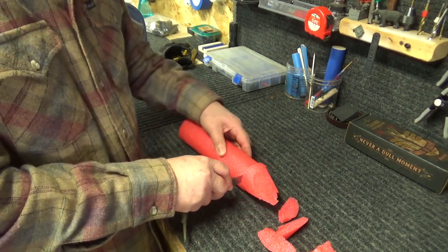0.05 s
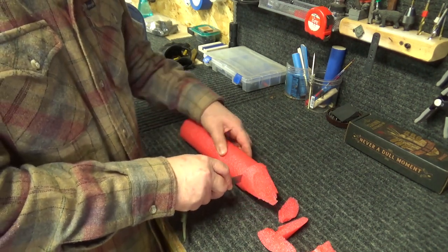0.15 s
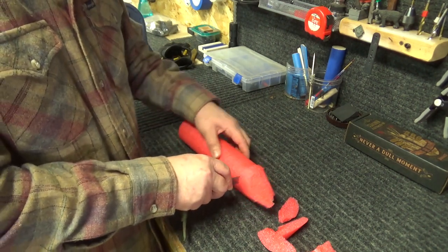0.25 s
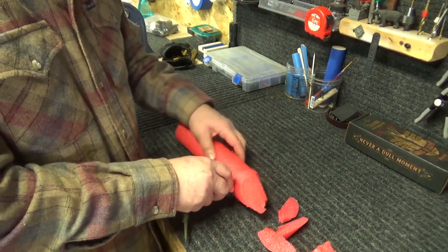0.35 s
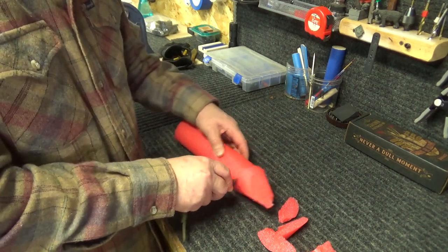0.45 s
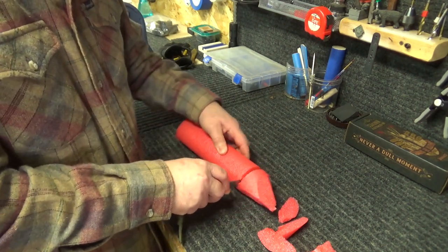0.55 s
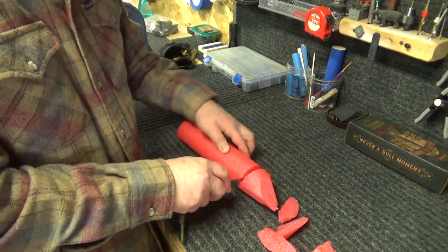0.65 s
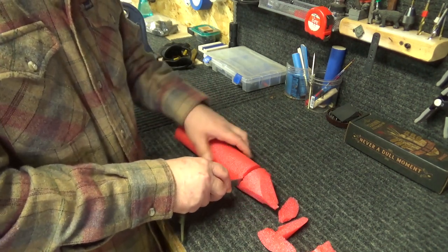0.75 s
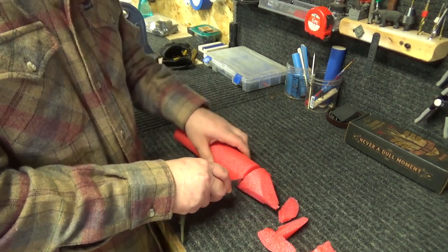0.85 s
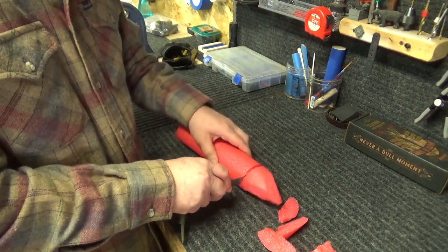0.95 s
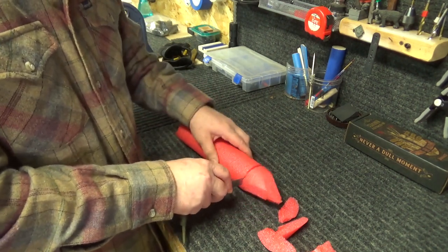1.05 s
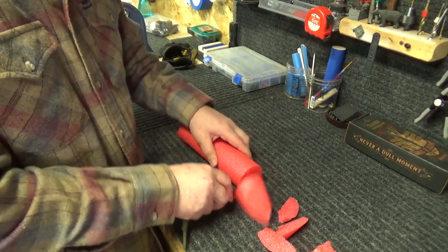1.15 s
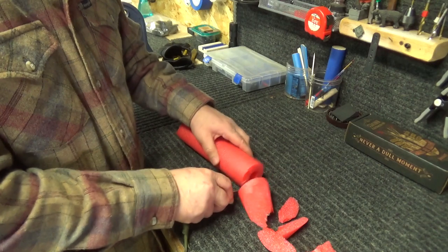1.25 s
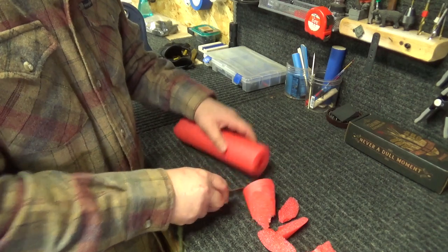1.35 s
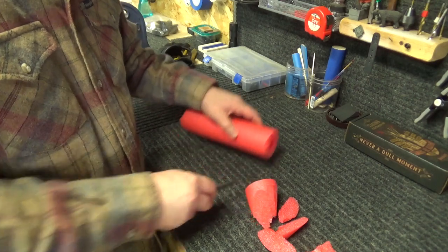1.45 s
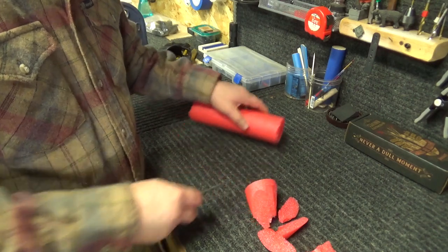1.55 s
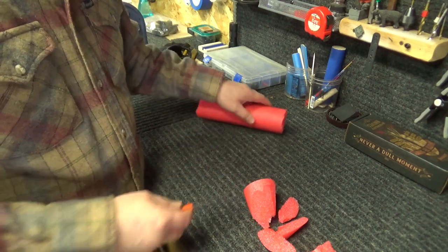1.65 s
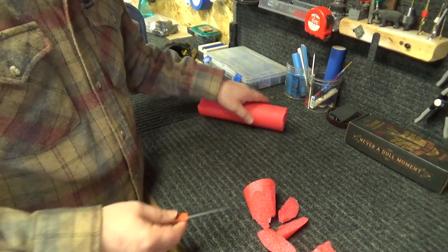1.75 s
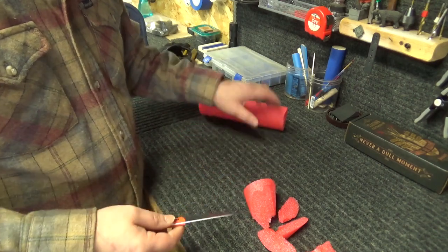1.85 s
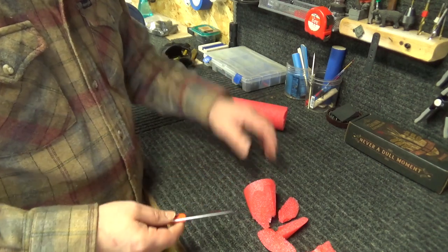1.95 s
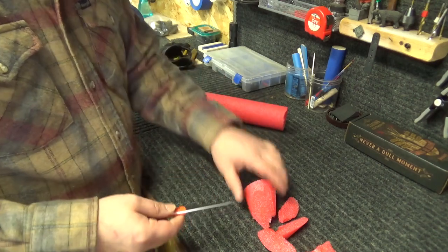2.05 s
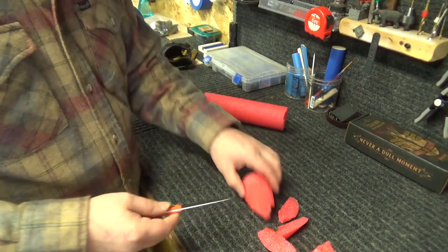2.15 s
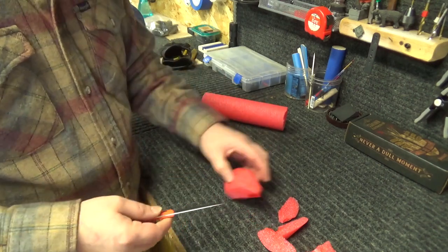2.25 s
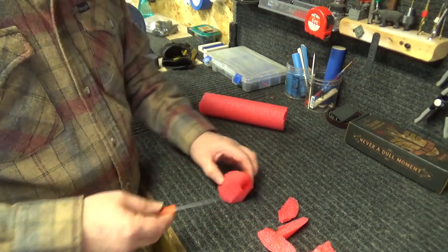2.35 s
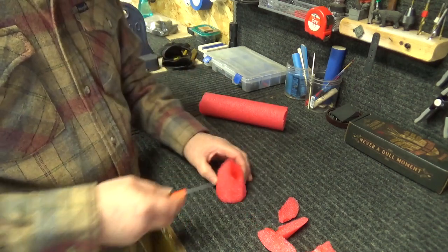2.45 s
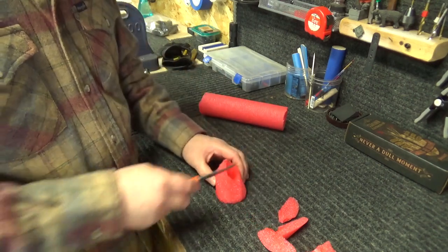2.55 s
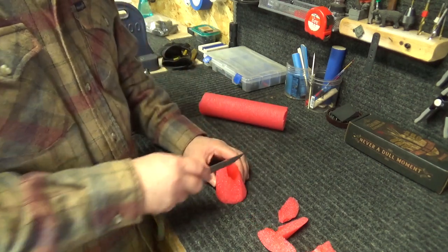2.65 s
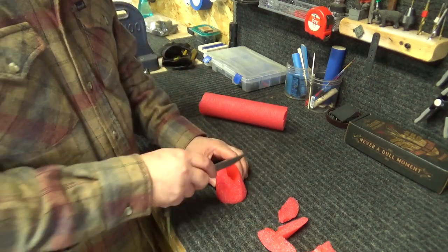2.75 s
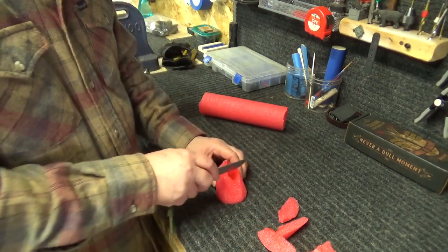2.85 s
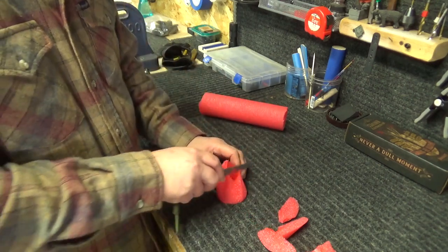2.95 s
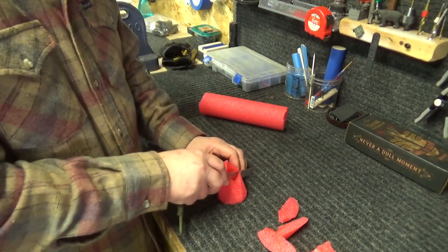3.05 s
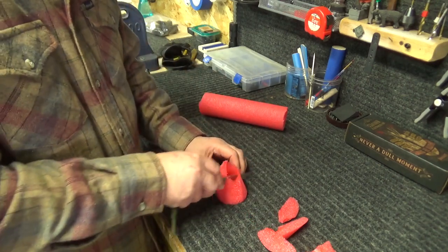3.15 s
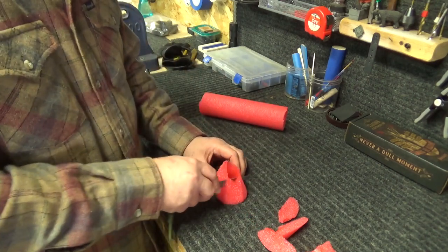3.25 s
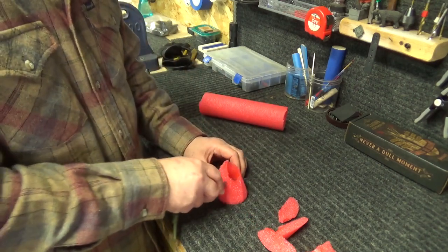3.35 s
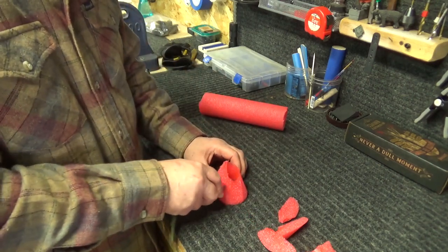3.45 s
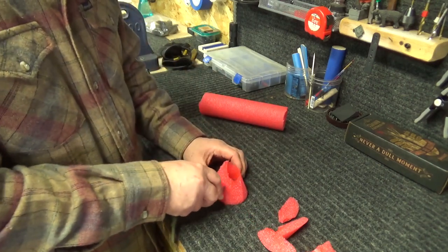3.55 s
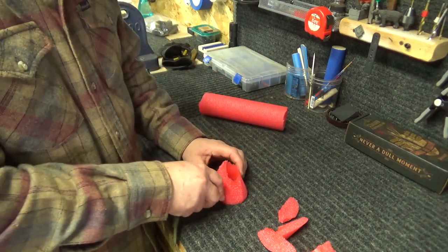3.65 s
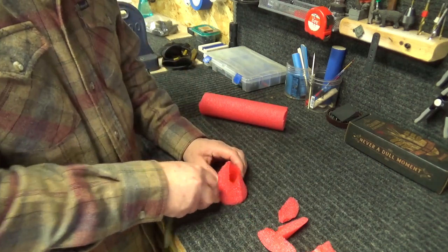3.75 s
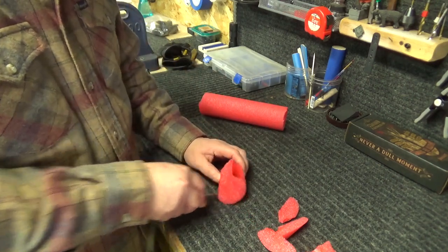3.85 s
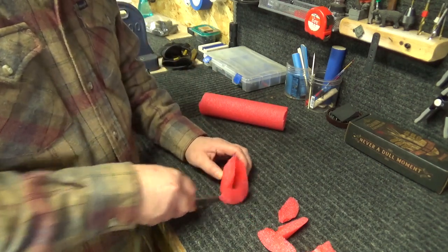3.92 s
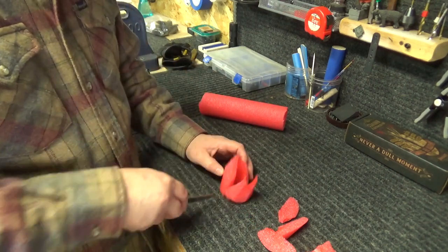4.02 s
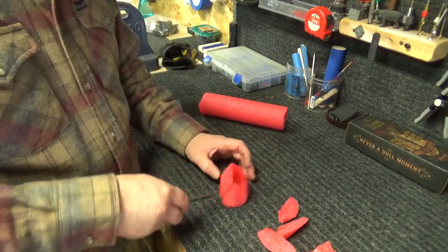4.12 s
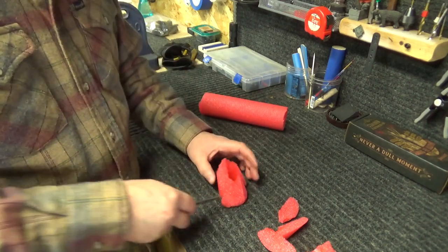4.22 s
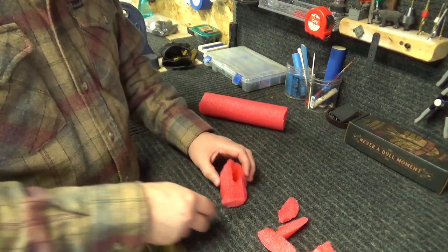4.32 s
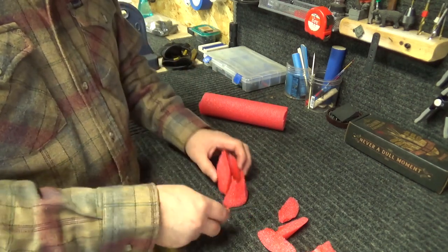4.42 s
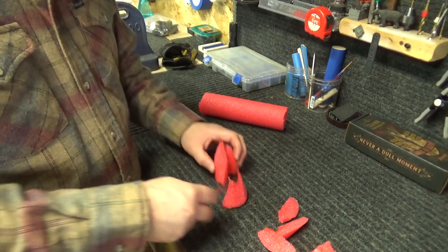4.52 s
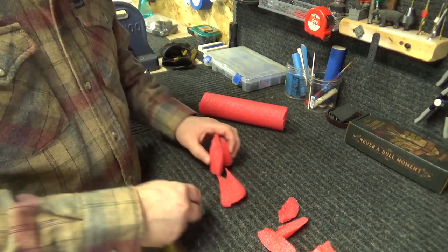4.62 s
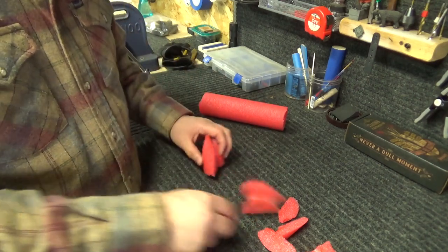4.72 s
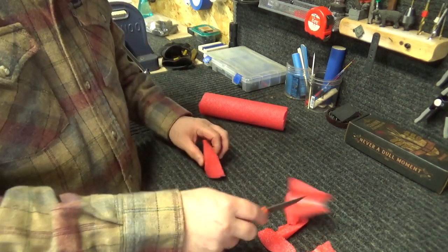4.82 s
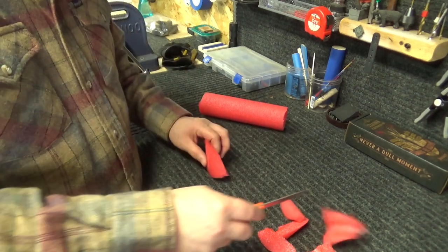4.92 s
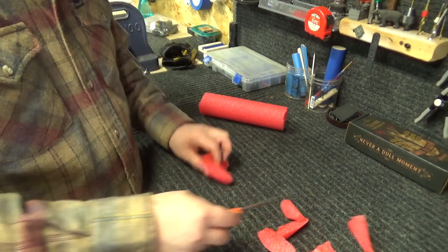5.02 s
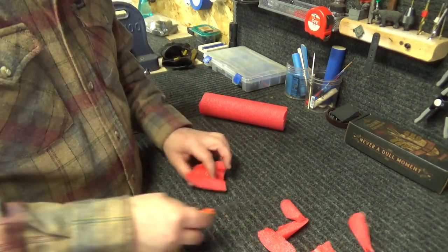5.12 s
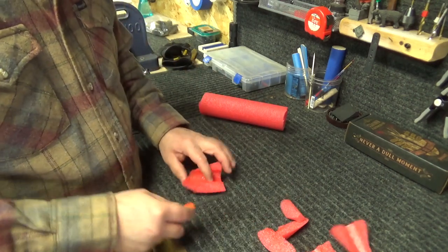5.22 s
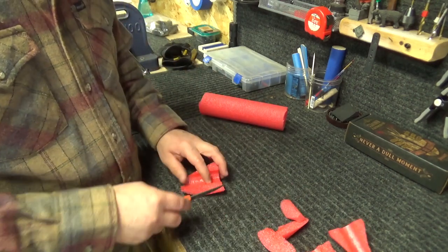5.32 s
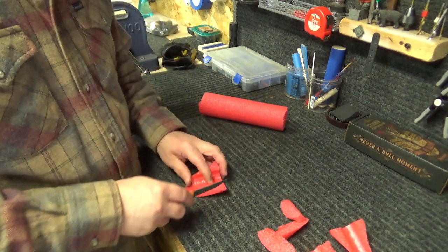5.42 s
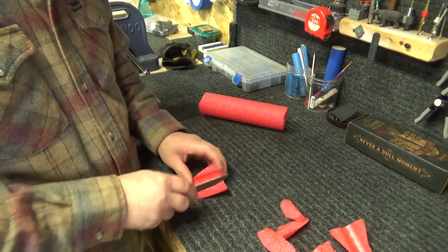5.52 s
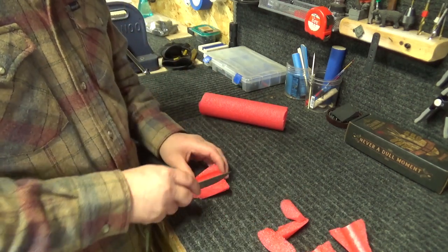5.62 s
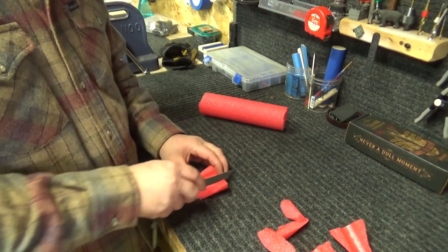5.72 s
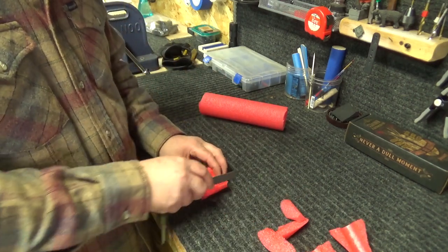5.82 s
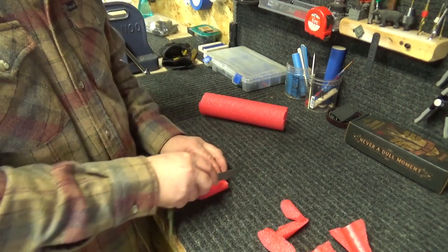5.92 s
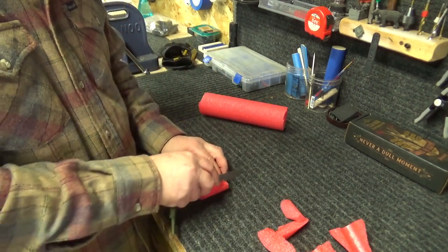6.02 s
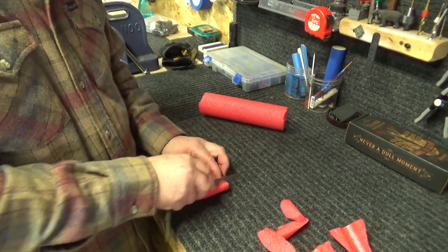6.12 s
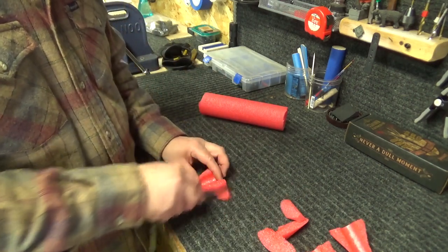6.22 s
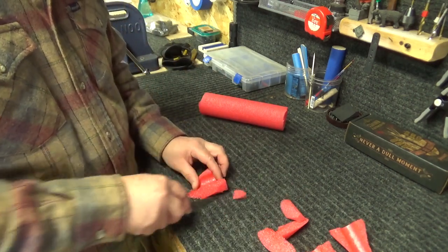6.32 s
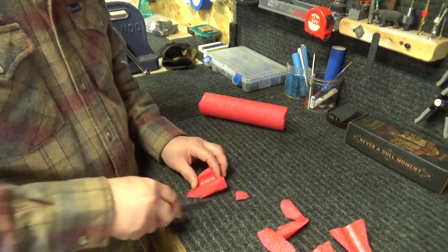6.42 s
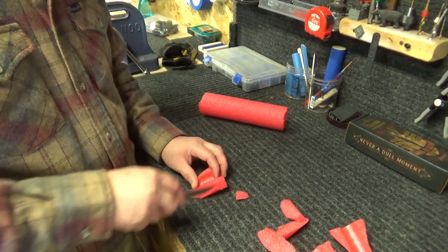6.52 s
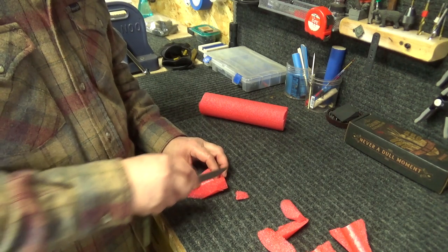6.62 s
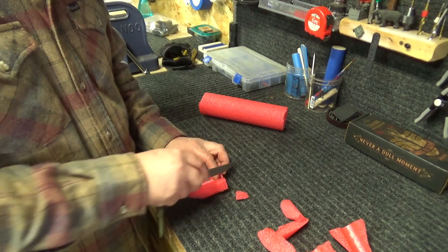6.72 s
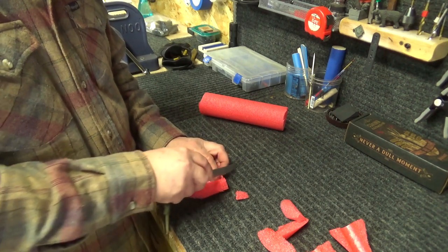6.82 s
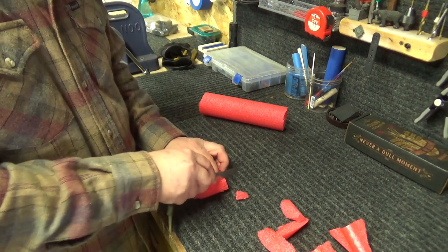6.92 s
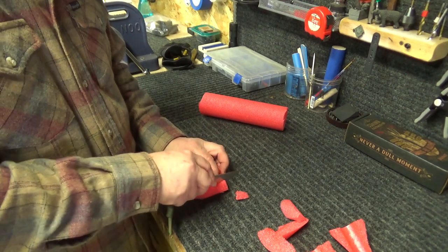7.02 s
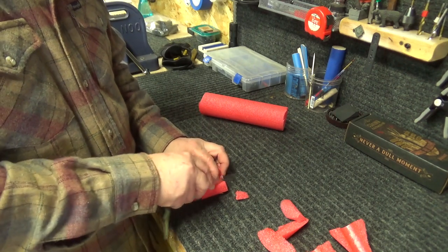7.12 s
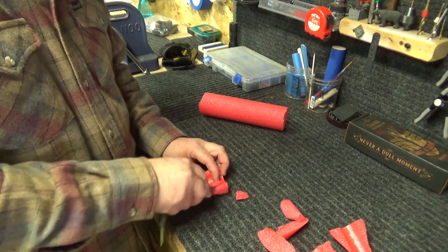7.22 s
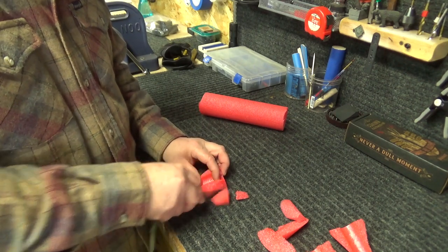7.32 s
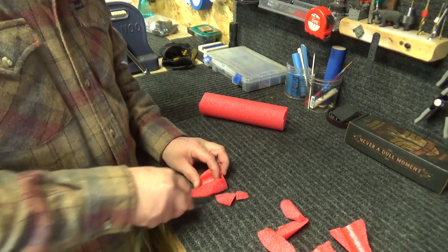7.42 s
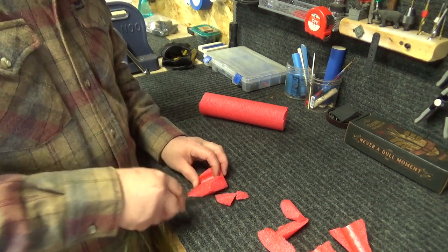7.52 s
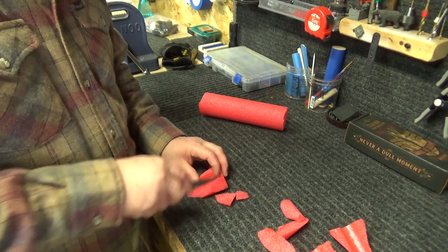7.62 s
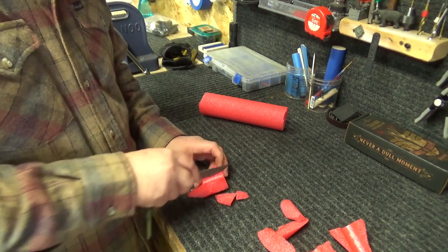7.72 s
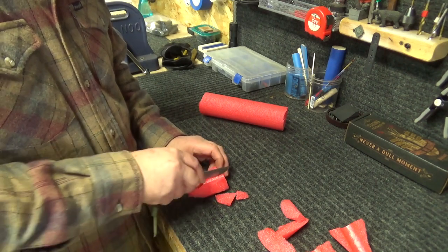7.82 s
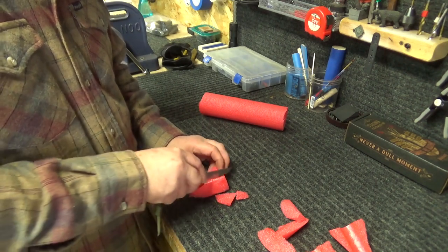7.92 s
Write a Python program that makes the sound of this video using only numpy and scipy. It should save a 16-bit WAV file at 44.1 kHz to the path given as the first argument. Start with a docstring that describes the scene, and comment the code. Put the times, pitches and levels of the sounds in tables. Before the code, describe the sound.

In a small, quiet workshop with a faint low hum, a thin knife cuts a foam noodle on a matted bench. First come a few dull hollow pops, then soft rubbing as the piece is picked up, then a dense run of loud crackling rips. After a lull of rustling, two short crisp snips finish. Close microphone, dry, short room tail.

```python
"""In a small, faintly humming workshop, a thin knife slices a hollow foam noodle on a matted bench, close by.
Bursting foam cells are random impulses convolved with damped modes of the cell wall and the hollow piece.
Strokes crackle in slips, snaps release at once, and both excite resonators for the thin blade.
Hands and sleeves rub the foam: grain noise through coloured filters and drifting resonances.
Bumps on the mat are damped bench modes; a short noise tail and one bench bounce form the room."""
import sys
import numpy as np
from scipy import signal
from scipy.fft import rfft, irfft
from scipy.io import wavfile

SR = 44100
rng = np.random.default_rng(int(sys.argv[2]) if len(sys.argv) > 2 else 0)


def transcribe(signal):
    """Save signal, clipped to [-1, 1], as a 16-bit WAV file at the path in sys.argv[1]."""
    frames = np.atleast_2d(signal).T
    limited = np.clip(frames, -1, 1)
    pcm = np.round(limited * 32767).astype(np.int16)
    wavfile.write(sys.argv[1], SR, pcm)


N = 351473
T = np.arange(N) / SR  # time axis, t/s

# Levels in the tables are those of the source, ahead of the resonators and the room.
# room noise colour: f/Hz, level/dB
SHOP_COLOUR = [(20, -23), (45, -2), (70, 2), (150, -4.5), (220, -2), (700, -8.5), (1400, -12),
               (2800, -25.5), (8300, -27), (10500, -31.5), (16000, -32.5)]
# rustle of sleeves and grip: t/s, level/dB
RUSTLE_LEVEL = [(0, -46), (.6, -55.5), (.78, -59.5), (1.25, -57), (1.6, -65.5), (2.12, -69), (2.55, -49.5),
                (2.78, -60), (3.15, -50.5), (3.85, -44), (4.16, -64.5), (4.52, -63), (4.8, -52), (5.5, -49),
                (6.1, -54), (6.9, -60), (7.55, -46.5), (7.75, -56.5)]
# rubbed foam colour: f/Hz, level/dB
RUB_COLOUR = [(150, -16), (350, -3.5), (550, -2), (800, -1.5), (1150, -0.5), (2000, -3), (2700, -3.5),
              (5000, -5), (6700, -7.5), (8300, -4), (10300, -16.5), (13000, -12), (16000, -19)]
# fingers or the flat of the blade sweep over the foam: start t/s, length t/s, level/dB, rasp f/Hz
SWEEPS = [ (0, 0.16, -46.5, 1710), (0.281, 0.16, -41.5, 1860), (0.448, 0.22, -35, 1500),
          (1.094, 0.2, -46.5, 1900), (1.297, 0.13, -48.5, 1710), (1.698, .14, -49.5, 2550),
          (2.148, 0.068, -44.5, 2400), (2.203, .14, -38, 2480), (2.37, 0.11, -47.5, 1900),
          (2.473, 0.089, -40.5, 2050), (2.804, 0.06, -47.5, 2510), (3.987, .15, -49.5, 1670),
          (4.378, 0.12, -53, 2800), (4.571, 0.14, -51.5, 2710), (4.714, 0.11, -42.5, 2610),
          (5.088, 0.21, -34.5, 3200), (5.293, 0.072, -39, 4150), (5.949, .15, -46.5, 1700),
          (6.351, 0.073, -43.5, 1600), (6.442, 0.13, -47.5, 2680), (6.598, .1, -52, 1400),
          (6.707, .05, -44.5, 1900), (6.994, 0.056, -47, 2120), (7.165, 0.25, -36, 4200),
          (7.406, .06, -48.5, 3430), (7.72, 0.029, -45.5, 1830)]
# foam under the edge, cut by cut: from t/s, wall ring f/Hz, crispness level/dB, body f/Hz, cell rate/(1/s)
FOAM_CUTS = [(0, 1117, -4, 348, 3300), (2.8, 1090, -3, 720, 1600), (3.32, 1170, 1.5, 676, 1000),
             (6.1, 1264, 4, 1035, 6000), (7.1, 1340, 14.5, 724, 8600)]
# foam wall around the cut: multiple of its ring frequency, level/dB, t60/s
WALL_MODES = [(1, 1, 0.0057), (1.13, -7, 0.015), (1.48, 1, 0.008), (2, 2.5, 0.0027), (3.1, -11.5, 0.0073)]
# the whole hollow piece: multiple of its body frequency, level/dB, t60/s
PIECE_MODES = [(1, 0, 0.022), (1.9, -4, 0.022)]
# direct tick of a bursting cell, colour: f/Hz, level/dB
BURST_COLOUR = [(120, 0), (400, -1), (800, -12.5), (1500, -0.5), (2600, -1.5), (3600, 0), (5200, -2.5),
                (6500, -7), (8300, -2), (10000, -14.5), (12300, -10.5), (16000, -15)]
# the blade jerks through a tough cell wall: t/s, peak level/dB, crispness over that of the cut, level/dB
WALL_SNAPS = [ (0.046, -19, 6), (.12, -20.5, 6), (.186, -10.5, 0), (0.502, -11, 3.5), (0.547, -24, -13),
              (0.563, -1.5, 9.5), (.85, -23, 15), (0.966, -23.5, 6), (1.097, -19.5, 17), (1.173, -12, 6),
              (1.186, -7.5, 5), (2.903, -23, -8), (2.942, -6, 5), (2.999, -1.5, -7), (3.0139, -3.5, 2),
              (3.0318, -0.5, 0.5), (3.0554, -1.5, -1), (3.078, -4, 0.5), (3.111, -9, -2), (3.208, -.5, 3.5),
              (3.339, -23, -4), (3.4712, -10.5, 4), (3.527, -5.5, 9), (3.666, 1, 3.5), (3.698, -1, 9),
              (3.867, -12, -4), (3.927, -14.5, -2.5), (4.385, -29.5, 0), (4.459, -25, -2),
              (4.824, -19.5, 6), (5.33, -15.5, 13), (5.527, -12, 4), (6.156, -18, 30.5), (6.289, 0.5, 6),
              (7.21, 4, 1), (7.3783, -9, 15)]
# thin blade, damped by the foam around it: f/Hz, level/dB, t60/s
STEEL_MODES = [(3400, -9, 0.14), (3440, -12.5, 0.12), (5560, -10, 0.059), (8064, -4, 0.36)]
# soft bumps on the mat: t/s, peak level/dB, pitch f/Hz
MAT_BUMPS = [(0.391, -37, 270), (.503, -21, 316), (0.563, -23, 354), (0.893, -36, 402), (2.171, -31, 373),
             (6.334, -17.5, 315), (7.369, -23.5, 321)]
# bench under the mat: multiple of the bump pitch, level/dB, t60/s
MAT_BENCH_MODES = [(.49, -9, 0.077), (1, 4, 0.026), (1.3, 1, 0.019), (1.72, -4, 0.032), (2.2, 6.5, 0.014)]
# strokes of the blade: start t/s, push t/s, release t/s, level/dB at the end of the push,
# rise over the push, level/dB (negative: it falls)
BLADE_STROKES = [ (.498, .075, 0.011, -25, 2), (0.992, 0.021, 0.034, -33.5, 1),
                 (1.147, 0.043, 0.032, -33, 6), (2.91, 0.049, 0.17, -38, 11),
                 (3.027, 0.068, 0.074, -20.5, 1.5), (3.205, 0.033, 0.084, -20, 13),
                 (3.36, 0.079, 0.073, -26, 10.5), (3.513, 0.02, 0.13, -22, 10.5),
                 (3.604, 0.088, .025, -26, 4), (3.799, 0.1, 0.31, -36, -1.5), (6.148, 0.049, 0.2, -25, 10),
                 (6.228, 0.06, .045, -17.5, 12), (6.301, 0.024, 0.019, -26, 12),
                 (7.204, 0.0555, 0.032, -16, -3), (7.292, 0.011, 0.077, -24, -14.5),
                 (7.362, 0.0035, 0.022, -20, -12)]


def amp(db):
    """Level to amplitude: 20 dB is a factor of ten."""
    return 10 ** (np.asarray(db) / 20)


def unit(x):
    """Normalisation to unit rms."""
    return x / np.sqrt(np.mean(x ** 2))


def add(out, s, x):
    """Superposition: mix x into out from time s on."""
    i = max(int(s * SR), 0)
    out[i:i + len(x)] += x[:max(len(out) - i, 0)]


def cut(x, hz, kind, order=2):
    """Butterworth filtering, maximally flat in the low- or high-pass band."""
    return signal.sosfilt(signal.butter(order, hz, kind, fs=SR, output="sos"), x)


def band(x, hz, width):
    """Second-order resonance; its bandwidth is a share of its frequency."""
    return signal.lfilter(*signal.iirpeak(hz, 1 / width, fs=SR), x)


def response(points, size=512):
    """Minimum phase by cepstral folding: a causal, unit-energy response with a given (Hz, dB) colour."""
    hz, db = np.transpose(points)
    f = np.maximum(np.fft.rfftfreq(size, 1 / SR), 1)
    colour_db = np.interp(np.log(f), np.log(hz), db)
    cepstrum = irfft(np.log(amp(colour_db)))
    cepstrum[1:size // 2] *= 2
    cepstrum[size // 2 + 1:] = 0
    h = irfft(np.exp(rfft(cepstrum)))
    return h / np.linalg.norm(h)


def ring(modes, hz, scatter, size=4096):
    """Modal superposition: damped sines whose pitch and sign depend on the spot hit; unit energy."""
    t = T[:size]
    h = np.zeros(size)
    for multiple, db, t60 in modes:
        sign = rng.choice([-1, 1])
        mode_hz = hz * multiple * (1 + scatter * rng.standard_normal())
        decay = np.exp(-np.log(1000) * t / t60)
        h += sign * amp(db) * decay * np.sin(2 * np.pi * mode_hz * t)
    return h / np.linalg.norm(h)


def walk(rate, n):
    """Random modulation: straight lines between Gaussian values, rate of them a second."""
    steps = rng.standard_normal(4096)
    return np.interp(T[:n] * rate, np.arange(len(steps)), steps)


def crackle(n, rate, spread_db):
    """Shot noise: tiny ruptures at random moments, rate a second, with widely scattered sizes; rms 1."""
    happens = rng.random(n) < rate / SR
    size_db = spread_db * np.clip(rng.standard_normal(n), -2, 2)
    return unit(happens * amp(size_db) * rng.choice([-1, 1], n))


def foam_at(s):
    """Local foam properties: ring Hz, crispness dB, body Hz and cell rate of the cut at time s."""
    return [row[1:] for row in FOAM_CUTS if row[0] <= max(s, FOAM_CUTS[0][0])][-1]


def rubbed(grains, tilt_db):
    """Source-filter principle: grains take the colour of rubbed foam, tilted in dB per octave."""
    colour = [(hz, db + tilt_db * np.log2(hz)) for hz, db in RUB_COLOUR]
    return signal.fftconvolve(grains, response(colour))[:len(grains)]


def rupture(hz, crisp_db, body_hz, body_db=-8.5):
    """Impulse response of one bursting cell: direct tick, wall ring and hollow note of the piece."""
    h = ring(WALL_MODES, hz, scatter=0.059, size=1024)
    h += amp(body_db) * ring(PIECE_MODES, body_hz, scatter=0.094, size=1024)
    add(h, 0, amp(crisp_db) * response(BURST_COLOUR))
    # a piece radiates little below its body note; some bass reaches the bench through the hand
    radiated = cut(h, 0.73 * body_hz, "highpass", order=4)
    through_hand = amp(-7.5) * cut(band(h, 165, 0.55), 140, "highpass")
    return radiated + through_hand


def workshop(air_db=-60, hum_hz=121.7, hum_db=-64.5):
    """Stationary noise and amplitude modulation: steady coloured air under a slightly wavering mains hum."""
    air = unit(signal.fftconvolve(rng.standard_normal(N), response(SHOP_COLOUR, size=8192))[:N])
    hum = np.sqrt(2) * np.sin(2 * np.pi * hum_hz * T)
    waver = amp(0.9 * walk(1.8, N))
    return amp(air_db) * air + amp(hum_db) * waver * hum


def rustle(sleeve_hz=2750, sleeve_tilt_db=0.38, rasp_db=-2.5, drift_db=4, rasp_width=0.16,
           flutter_db=2, touch_db=2, light_db=-56, dulling=0.44, treble_hz=3200, treble_flicker_db=1.5):
    """Friction of light touches: sleeves and grip with a drifting rasp, duller when faint."""
    flutter = amp(flutter_db * walk(100, N) + touch_db * walk(16, N))
    cloth = rubbed(crackle(N, rate=5000, spread_db=7) * flutter, sleeve_tilt_db)
    rasp = np.zeros(N)
    for hz in (sleeve_hz / 2, sleeve_hz):
        rasp += amp(rasp_db + drift_db * walk(5.8, N)) * band(cloth, hz, rasp_width)
    cloth = unit(cut(cloth + rasp, 140, "highpass"))
    db = np.interp(T, *np.transpose(RUSTLE_LEVEL))
    # below light_db the treble drops by a further dulling dB per dB
    treble_db = dulling * np.minimum(db - light_db, 0) + treble_flicker_db * walk(30, N)
    low = cut(cloth, treble_hz, "lowpass", order=3)
    treble = cut(cloth, treble_hz, "highpass", order=3)
    return amp(db) * (low + amp(treble_db) * treble)


def handling(rub_hz=2300, tilt_db=0.9, rasp_db=2, rasp_width=0.37, glide=0.12, swell=0.26):
    """Stick-slip friction: skin catches on open cells in uneven sweeps, brighter when the rasp is higher."""
    out = np.zeros(N)
    unevenness = amp(3.3 * walk(110, N) + 1.0 * walk(26, N))
    grains = crackle(N, rate=4900, spread_db=4.0) * unevenness
    for start, length, db, rasp_hz in SWEEPS:
        grip = grains[max(int(start * SR), 0):][:int(length * SR)]
        # treble tilt grows by tilt_db for each octave of rasp above rub_hz
        rub = rubbed(grip, tilt_db * np.log2(rasp_hz / rub_hz))
        # the rasp rises in pitch as the slide speeds up, and sinks as it stops
        speed = np.hanning(len(rub))
        slow = band(rub, rasp_hz * (1 - glide), rasp_width)
        fast = band(rub, rasp_hz * (1 + glide / 2), rasp_width)
        rub = rub + amp(rasp_db) * ((1 - speed) * slow + speed * fast)
        add(out, start, amp(db) * speed ** swell * unit(rub))
    return cut(out, 106, "highpass")


def noodle(x, until_s=1.6, dip_hz=3850, dip_width=0.36, dip_depth=0.45):
    """Absorption: the long noodle in hand soaks up upper mids, so it is duller than the cut pieces."""
    in_hand = np.clip((until_s - T) / .1, 0, 1)
    return x - dip_depth * in_hand * band(x, dip_hz, dip_width)


def snaps(lead_s=.006, creak_db=-20):
    """Sudden release of strain: cells creak, the tough wall gives way at once, neighbours follow."""
    out = np.zeros(N)
    n, give_way = SR // 20, int(lead_s * SR)
    time_constant = np.where(T[:n] < lead_s, .0014, .003)
    strain = np.exp(-np.abs(T[:n] - lead_s) / time_constant)
    for s, db, sharp_db in WALL_SNAPS:
        hz, crisp_db, body_hz, _ = foam_at(s)
        cells = amp(creak_db) * crackle(n, rate=4000, spread_db=3.5) * strain
        cells[give_way] = 1
        sound = signal.fftconvolve(cells, rupture(hz, crisp_db + sharp_db, body_hz))
        add(out, s - lead_s, amp(db) * sound / np.abs(sound).max())
    return out


def blade(x):
    """Resonance: the bursting cells also set the steel ringing faintly."""
    steel = np.zeros(N)
    for hz, db, t60 in STEEL_MODES:
        width = np.log(1000) / (np.pi * t60 * hz)  # bandwidth that gives this decay
        steel += amp(db) * band(x, hz, width)
    return x + steel


def bumps():
    """Soft impact: blade or foam meets the mat, a slow push that excites damped bench modes."""
    out = np.zeros(N)
    for s, db, hz in MAT_BUMPS:
        thud = ring(MAT_BENCH_MODES, hz, scatter=0.014)
        push = 1 - np.exp(-T[:len(thud)] / 0.0042)
        thud = cut(thud * push, 140, "highpass")
        add(out, s, amp(db) * thud / np.abs(thud).max())
    return out


def slicing(slip_s=.0065, slip_db=1.57, cluster_s=0.0084, tough_share=0.23, tough_db=-5, count=48,
            bite_s=0.0027, release_db=29):
    """Stick-slip fracture: uneven slips burst clusters of cells, some led by a tough one, till force lets go."""
    out, m = np.zeros(N), SR // 30
    # every piece rings a little differently from spot to spot
    spots = {}
    for row in FOAM_CUTS:
        hz, crisp_db, body_hz, _ = foam = row[1:]
        spots[foam] = [unit(rupture(hz, crisp_db + 2 * rng.standard_normal(), body_hz)) for _ in range(count)]
    for start, push_s, release_s, db, build_db in BLADE_STROKES:
        foam = foam_at(start)
        t = T[:int((push_s + release_s) * SR)]
        sound, s = np.zeros(len(t)), 0
        for spot in rng.permutation(count):
            cells = unit(crackle(m, rate=foam[-1], spread_db=4.0) * np.exp(-T[:m] / cluster_s))
            tough = rng.random() < tough_share
            cells[0] += tough * amp(tough_db) * np.linalg.norm(cells)
            strength = amp(slip_db * rng.standard_normal())
            if s < t[-1]:
                add(sound, s, strength * signal.fftconvolve(cells, spots[foam][spot]))
            s += slip_s * (.5 + rng.random())  # slip_s is the mean interval
        force_db = np.interp(t, [0, push_s, push_s + release_s], [-build_db, 0, -release_db])
        bite = np.minimum(t / bite_s, 1)
        add(out, start, amp(db + force_db) * bite * unit(sound))
    return out


def room(x, t60=0.1, wet_db=-14, bench_db=-14, bench_s=.0019):
    """Reflection and reverberation: one quick bench bounce and the short tail of a cluttered room."""
    t = T[:SR // 2]
    decay = np.exp(-np.log(1000) * t / t60)
    onset = 1 - np.exp(-t / 0.0042)
    tail = cut(rng.standard_normal(len(t)) * decay * onset, 9800, "lowpass", order=1)
    h = amp(wet_db) * tail / np.linalg.norm(tail)
    h[0] += 1  # direct sound
    add(h, bench_s, amp([bench_db]))
    return signal.fftconvolve(x, h)[:N]


def scene():
    """Superposition of all the work on the bench, heard in the room over its steady noise."""
    floor = workshop()
    touches = rustle() + handling()
    cutting = blade(snaps() + slicing())
    foam = noodle(touches + cutting)
    return (room(foam + bumps()) + floor)[None]


def record(dry, top_hz=15900):
    """Amplitude and band limiting: clipping at full scale, then a steep elliptic low-pass."""
    low_pass = signal.ellip(10, .2, 70, top_hz, fs=SR, output="sos")
    return signal.sosfilt(low_pass, np.clip(dry, -1, 1))


dry = scene()
out = record(dry)
transcribe(out)
```